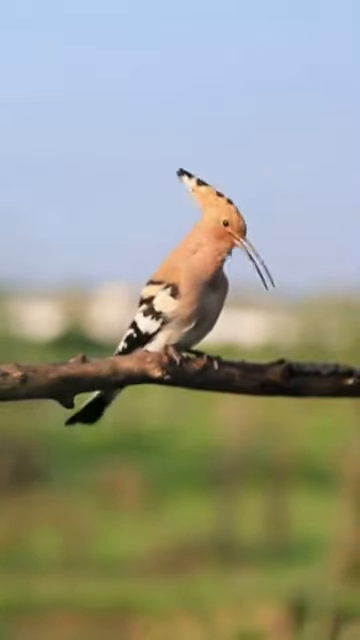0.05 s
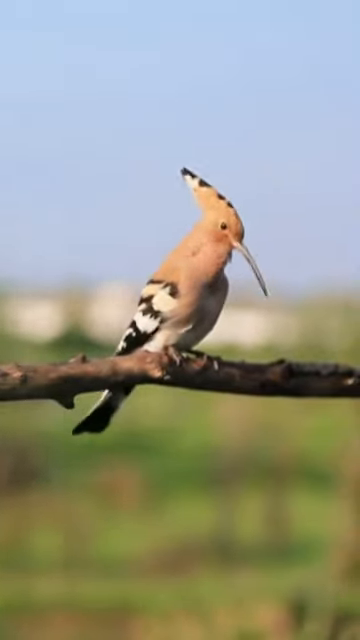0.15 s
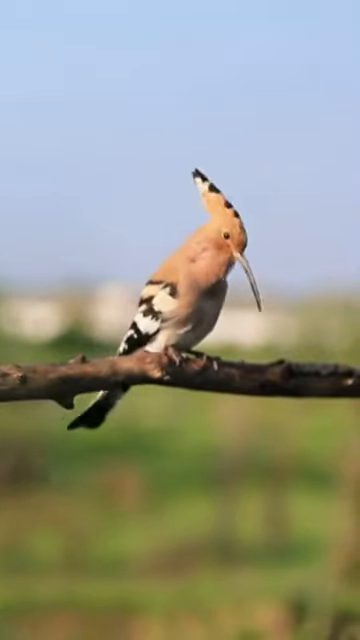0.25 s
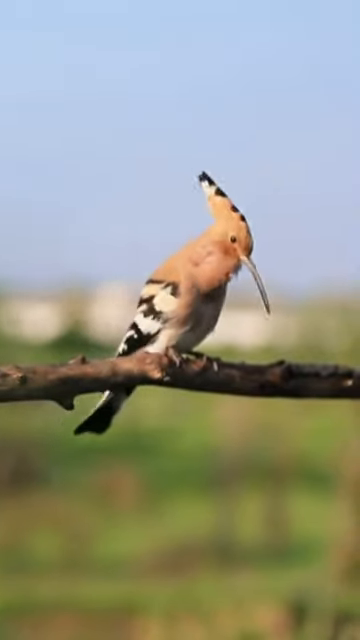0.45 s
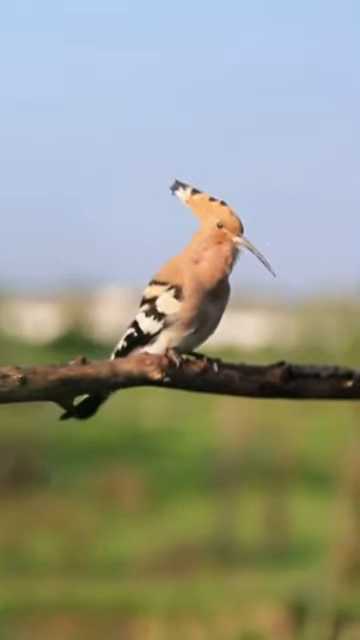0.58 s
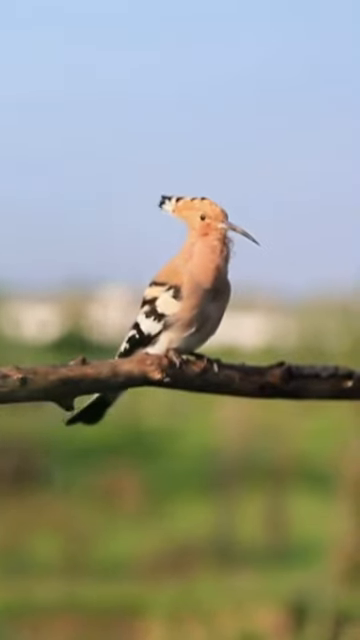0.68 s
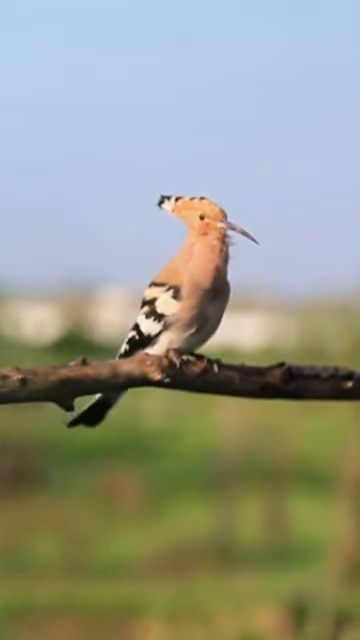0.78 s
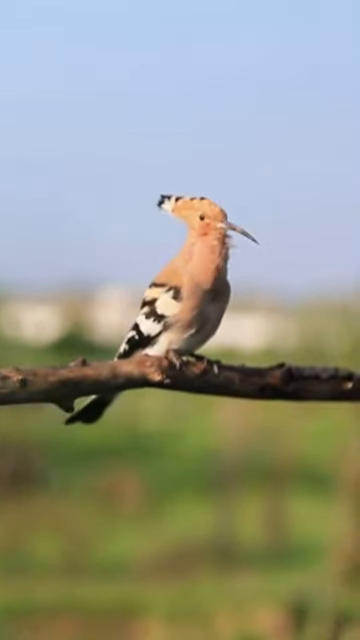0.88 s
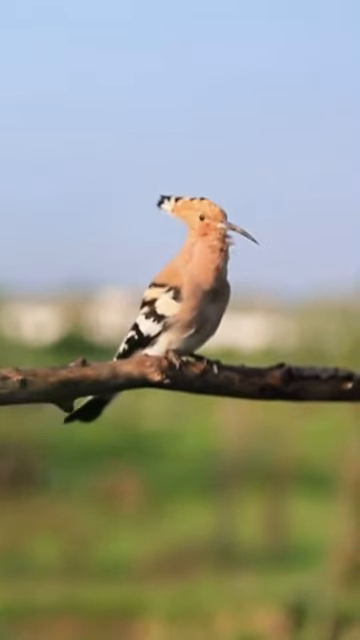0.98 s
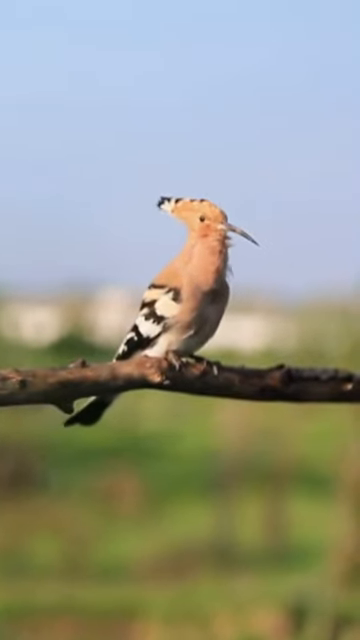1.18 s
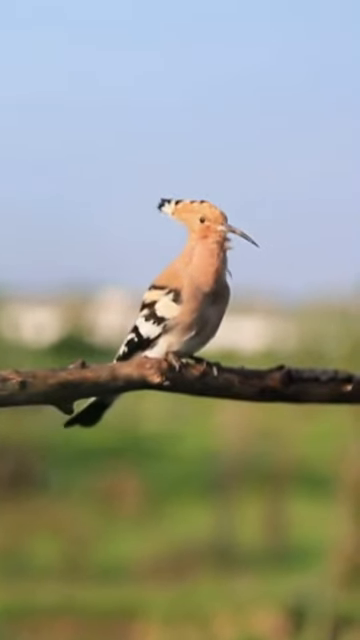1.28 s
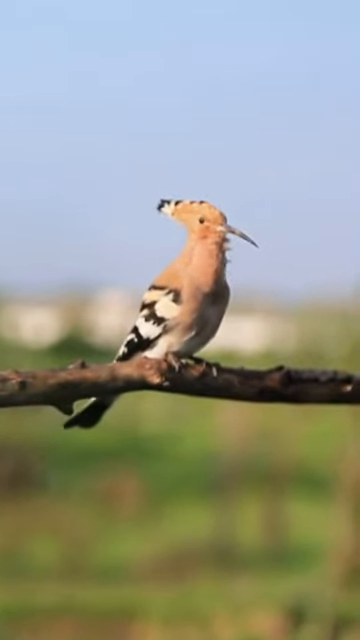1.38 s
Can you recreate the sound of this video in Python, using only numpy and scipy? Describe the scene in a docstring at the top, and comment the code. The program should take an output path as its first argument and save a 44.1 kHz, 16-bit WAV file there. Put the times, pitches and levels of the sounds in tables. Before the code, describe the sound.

Two quick, round hoots come from a nearby perched hoopoe, clear and almost free of echo. Behind them and afterwards, distant birds whistle and chirp faintly over the soft, even hiss of open countryside.

```python
"""Hoopoe in open country

A hoopoe gives two soft, almost pure hoots; one effort governs both amplitude and frequency, so each
swells, lifts in pitch and closes quickly. Farther off, frequency-modulated tones make a flock's arched
whistles and held notes and the higher chirps of small birds, all scattered by trees and ground.
Noise bursts make tiny dry ticks and one soft rustle, over a steady broadband hush and low rumble."""
import sys
import numpy as np
from scipy import signal
from scipy.fft import rfft, irfft, next_fast_len
from scipy.io import wavfile
from scipy.ndimage import uniform_filter1d, map_coordinates

SR = 44100
rng = np.random.default_rng(int(sys.argv[2]) if len(sys.argv) > 2 else 0)


def transcribe(signal):
    """Save signal, clipped to [-1, 1], as a 16-bit WAV file at the path in sys.argv[1]."""
    frames = np.atleast_2d(signal).T
    limited = np.clip(frames, -1, 1)
    pcm = np.round(limited * 32767).astype(np.int16)
    wavfile.write(sys.argv[1], SR, pcm)


N = 63945

# Hoots: (start [s], swell [s], release [s], pitch at full effort [Hz], peak level [dB], pitch lag [s])
HOOTS = [(0.191, 0.088, 0.036, 587.7, -10, 0.00089), (0.4082, 0.072, 0.046, 592.4, -9, 0.00079)]
# Envelope of the hoot's harmonics: (frequency [Hz], level re fundamental [dB])
HOOT_OVERTONES = [(1178, -37), (1770, -45.5), (2360, -43.5), (4100, -44.5), (5100, -57), (7100, -51.5),
                  (8500, -56)]
# Arched calls: (apex [s], rise [s], fall [s], pitch [Hz], end droop [fraction], flick [Hz], level [dB])
ARCHED_WHISTLES = [ (0.03, 0.0225, .02, 1830, .2, 0, -48), (.089, .022, 0.029, 1740, 0.05, 268, -48),
                   (.123, .018, 0.052, 1782, .15, 269, -45), (.137, .008, 0.015, 1807, 0.4, 132, -47.5),
                   (0.198, .046, .024, 2107, 0.32, -17, -43.5), (0.244, .014, 0.019, 1803, .2, -4, -43.5),
                   (0.329, .021, 0.022, 1795, .17, 261, -46), (0.473, .04, 0.024, 1727, .17, 264, -46),
                   (.506, .02, 0.011, 1775, 0.01, 297, -43.5), (0.515, .0062, 0.034, 1700, 0.1, 225, -47),
                   (.545, .014, .016, 2082, 0.32, -15.5, -41.5), (.674, .04, 0.026, 1958, 0.27, 439, -41.5),
                   (.685, .008, 0.006, 2377, 0.14, -20, -44), (0.818, .017, 0.0069, 1450, 0.28, 27, -47),
                   (.852, .023, .017, 1763, .16, 15, -44), (.872, .015, 0.009, 1760, 0.25, 22, -44),
                   (.885, .016, 0.023, 2066, 0.29, -7, -46), (0.957, .024, 0.016, 1561, 0.1, 8, -47.5),
                   (1.072, .013, 0.0058, 1780, .06, -10, -37), (1.087, .0411, 0.03, 1853, 0.22, 383, -42.5),
                   ]
# Held calls: (start [s], length [s], first pitch [Hz], last pitch [Hz], opening scoop [Hz],
# closing drop [Hz], mid-note level [dB], swell [dB])
HELD_NOTES = [ (0.147, 0.059, 1464, 1625, -0.5, 101.5, -46.5, 4),
              (.561, 0.097, 1523, 1417, 521, -7.5, -46, 4), (0.676, .054, 1627, 1502, 345, 477, -45, -1.5),
              (0.747, 0.084, 1507, 1550, -2, 98, -53.5, -1), (1.371, 0.061, 1399, 1499, 5, 5, -55.5, 9), ]
# Chirps: (start [s], length [s], first pitch [Hz], last pitch [Hz], roughness [fraction], level [dB])
CHIRPS = [ (0.03, 0.068, 3530, 4600, 0.03, -51.5), (0.084, 0.053, 4430, 3280, 0.05, -46),
          (0.142, 0.13, 4256, 4014, 0.084, -51.5), (0.186, 0.016, 3600, 3150, 0.0061, -43),
          (0.21, 0.055, 3127, 3850, 0.066, -49), (0.246, 0.027, 3190, 3097, 0.057, -45),
          (0.335, 0.135, 3800, 4080, 0.06, -54.5), (0.68, 0.023, 4560, 4760, 0.019, -49),
          (0.825, 0.024, 5990, 5680, 0.049, -51), (0.846, 0.016, 4500, 5680, 0.038, -46),
          (0.858, 0.033, 4700, 3650, 0.072, -48), (0.951, .012, 3760, 3590, .025, -52),
          (1.128, 0.072, 3210, 3290, 0.014, -59.5), (1.162, 0.035, 3770, 3835, 0.017, -50),
          (1.218, 0.021, 3780, 3566, 0.075, -48), (1.121, .165, 3950, 3710, .05, -56),
          (1.424, 0.025, 4050, 4490, 0.045, -50), ]
# Distinct ticks: (time [s], level [dB])
TICKS = [(0.1324, -42), (0.2315, -34), (0.233, -37), (0.426, -40.5), (0.5334, -37.5), (0.659, -44),
         (.92, -48), (0.931, -48.5), (0.941, -46), (1.335, -46.5)]
# Noise spectra: (frequency [Hz], relative spectral density [dB])
TICK_SPECTRUM = [(3000, -10), (6200, -10.5), (8200, -1), (9300, -2), (11000, -19), (15000, -28.5)]
RUSTLE_SPECTRUM = [(120, -21), (380, -3.5), (650, -2), (1100, -35.5)]
HUSH_SPECTRUM = [(26, -14), (58, -2.8), (125, -3), (185, -0.5), (285, -7), (480, -6), (750, -12.5),
                 (1100, -14), (1700, -11.5), (2500, -16), (3700, -9.5), (5000, -14.5), (7200, -20.5),
                 (8700, -20.5), (11000, -32), (15000, -37.5)]
RUMBLE_SPECTRUM = [(36, -38), (66, -16), (81, -2), (104, -18.5), (155, -42)]
# Decay of sound scattered by trees and ground: (frequency [Hz], reverberation time [s])
FIELD_T60 = [(500, 0.34), (2000, 0.13), (8000, 0.051)]


def hoopoe():
    """Coupled modulation: effort sets level and pitch; the swollen throat leaves only faint harmonics."""
    sag_hz, climb_hz_per_s, throat_smoothing_s = 57.3, 190, 0.002
    t, out = np.arange(N) / SR, np.zeros(N)
    for start, swell, release, top_hz, db, lag in HOOTS:
        age = t - start
        effort = hoot_effort(age, swell, release)
        envelope = np.abs(uniform_filter1d(effort, size=round(throat_smoothing_s * SR)))
        slack = 1 - hoot_effort(age - lag, swell, release)  # the pitch trails the effort
        phase = phase_of(top_hz + climb_hz_per_s * (age - swell) - sag_hz * slack ** 2.1)
        overtones = sum(amp(along(HOOT_OVERTONES, k * top_hz)) * np.sin(k * phase) for k in range(2, 15))
        out += amp(db) * envelope * (np.sin(phase) + overtones)
    return out


def hoot_effort(age, swell, release):
    """Driving function: a steadily growing push rounds off at its top, then falls parabolically."""
    up = np.clip(age / swell, 0, 1)
    down = np.clip((age - swell) / release, 0, 1)
    return np.clip((up + up ** 3 * (1 - up)) * (1 - down ** 2), 0, 1)


def flock_whistles():
    """Frequency modulation: pitch follows a parabolic arch, in some calls flicking up at the apex."""
    flick_s = 0.0056
    t, out = np.arange(N) / SR, np.zeros(N)
    for apex, rise, fall, hz, droop, flick_hz, db in ARCHED_WHISTLES:
        away = np.clip(np.maximum((apex - t) / rise, (t - apex) / fall), 0, 1)
        pitch = hz * (1 - droop * away ** 2) + flick_hz * np.exp(-((t - apex) / flick_s) ** 2)
        envelope = 1 - away ** 5.7  # nearly square
        out += envelope * whistle(pitch, db)
    return out


def flock_held_notes():
    """Exponential glides: a nearly level pitch may open with an upward scoop or close with a drop."""
    glide_s, fade_s = 0.006, 0.0028
    t, out = np.arange(N) / SR, np.zeros(N)
    for start, length, first_hz, last_hz, scoop_hz, drop_hz, db, swell_db in HELD_NOTES:
        age = np.clip(t - start, 0, length)
        left, progress = length - age, age / length
        scoop = scoop_hz * np.exp(-age / glide_s)
        drop = drop_hz * np.exp(-left / glide_s)
        pitch = first_hz + (last_hz - first_hz) * progress - scoop - drop
        envelope = np.minimum(np.minimum(age, left) / fade_s, 1)
        out += envelope * whistle(pitch, db + swell_db * (progress - 0.5))
    return out


def whistle(pitch, db):
    """Jitter and shimmer: a tone with a weak second harmonic wavers in frequency and amplitude."""
    jitter, shimmer_db, octave_db = 0.008, 1.3, -18.5
    phase = phase_of(pitch * (1 + jitter * wobble(rate=400)))
    amplitude = np.sqrt(2) * amp(db + shimmer_db * wobble(rate=190))
    return amplitude * (np.sin(phase) + amp(octave_db) * np.sin(2 * phase))


def small_birds():
    """Modulation sidebands: fast random pitch changes broaden high glides, from clear to raspy."""
    shimmer_db = 2.5
    t, out = np.arange(N) / SR, np.zeros(N)
    for start, length, first_hz, last_hz, roughness, db in CHIRPS:
        progress = np.clip((t - start) / length, 0, 1)
        glide = first_hz + (last_hz - first_hz) * progress
        pitch = glide * (1 + roughness * wobble(rate=1200))
        envelope = np.sqrt(2 * np.abs(np.sin(np.pi * progress)))
        out += amp(db + shimmer_db * wobble(rate=220)) * envelope * np.sin(phase_of(pitch))
    return out


def ticks():
    """Broadband transients: short windows gate bright noise into distinct ticks and random faint ones."""
    tick_s, faint_db = 0.0025, -54
    t, envelope = np.arange(N) / SR, np.zeros(N)
    faint = [(start, faint_db) for start in rng.uniform(0, N / SR, size=24)]
    for start, db in TICKS + faint:
        envelope += amp(db) * np.sin(np.pi * np.clip((t - start) / tick_s, 0, 1)) ** 2
    return envelope * noise(TICK_SPECTRUM)


def rustle(peak_s=1.293, width_s=0.02, db=-50):
    """Amplitude modulation: a Gaussian envelope shapes dull noise into one soft swell."""
    t = np.arange(N) / SR
    return amp(db) * np.exp(-((t - peak_s) / width_s) ** 2) * noise(RUSTLE_SPECTRUM)


def scatter(x):
    """Diffuse reverberation: trees and ground return an exponential tail whose treble dies first."""
    hz, t, spectrogram = signal.stft(rng.standard_normal(SR // 2), SR, nperseg=256)
    decay = amp(-60 * t / along(FIELD_T60, hz)[:, None])
    tail = signal.istft(spectrogram * decay, SR, nperseg=256)[1]
    return signal.fftconvolve(x, tail / np.linalg.norm(tail))[:N]


def open_air(hush_db=-48.5, patch_db=2.2, rumble_db=-58):
    """Ambient noise: a hush fluctuates faintly in time and frequency over a distant rumble."""
    spectrogram = signal.stft(noise(HUSH_SPECTRUM), nperseg=512)[2]
    patches = uniform_filter1d(rng.standard_normal(spectrogram.shape), size=7, axis=0)  # across frequency
    patches = uniform_filter1d(patches, size=12, axis=1)  # across time
    hush = signal.istft(spectrogram * amp(patch_db * unit(patches)), nperseg=512)[1][:N]
    return amp(hush_db) * unit(hush) + amp(rumble_db) * noise(RUMBLE_SPECTRUM)


def amp(db):
    """Decibel law: 20 dB is a factor of ten in amplitude."""
    return 10 ** (np.asarray(db) / 20)


def unit(x):
    """Normalisation to an rms of 1."""
    return x / np.sqrt(np.mean(x ** 2) + 1e-20)


def along(points, hz):
    """Interpolation of (frequency [Hz], value) points on a logarithmic frequency axis."""
    frequencies, values = np.transpose(points)
    return np.interp(np.log(hz + 1), np.log(frequencies + 1), values)


def wobble(rate):
    """Smooth random modulation: a spline through `rate` knots a second."""
    return map_coordinates(rng.standard_normal(N // 8), [np.arange(N) * rate / SR], mode="wrap")


def filtered(x, response):
    """Linear filtering: the spectrum is multiplied by a frequency response."""
    size = next_fast_len(N + 8192)
    return irfft(rfft(x, size) * response(np.fft.rfftfreq(size, 1 / SR)), size)[:N]


def noise(spectrum):
    """Spectral shaping: white noise becomes coloured noise of rms 1."""
    return unit(filtered(rng.standard_normal(N), lambda hz: amp(along(spectrum, hz))))


def phase_of(hz):
    """Phase is the time integral of angular frequency."""
    return 2 * np.pi * np.cumsum(hz) / SR


def scene():
    """Superposition: the near hoopoe is almost dry, with one weak echo; far birds reverberate more."""
    echo_s, echo_db = 0.021, -30.5
    near_wet_db, far_wet_db = -51, -10.5
    t = np.arange(N) / SR
    near = hoopoe()
    far = flock_whistles() + flock_held_notes() + small_birds()
    echo = amp(echo_db) * np.interp(t - echo_s, t, near)
    wet = amp(near_wet_db) * scatter(near) + amp(far_wet_db) * scatter(far)
    return (near + far + echo + wet + ticks() + rustle() + open_air())[None]


def record(dry):
    """Band limiting: an ideal low-pass filter removes the highest treble."""
    cutoff_hz = 15500
    return np.array([filtered(channel, lambda hz: hz < cutoff_hz) for channel in dry])


dry = scene()
out = record(dry)
transcribe(out)
```